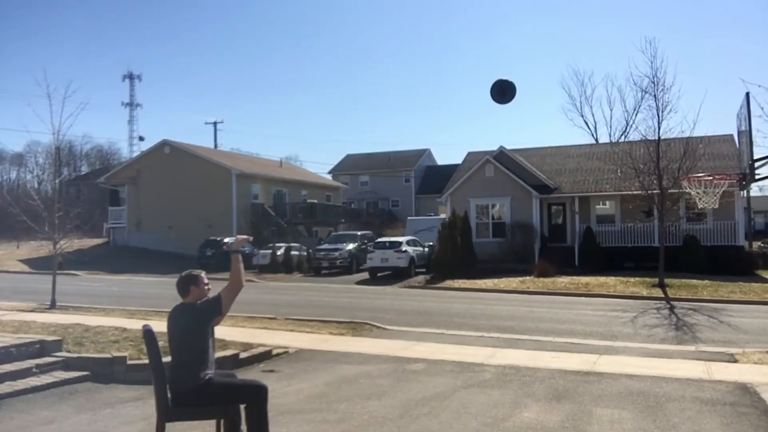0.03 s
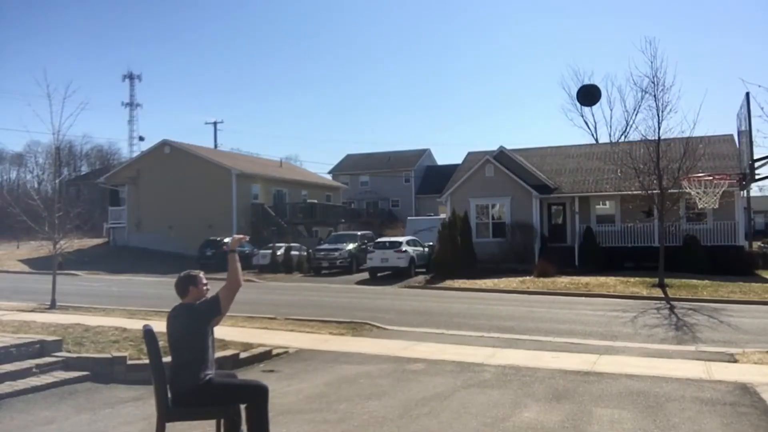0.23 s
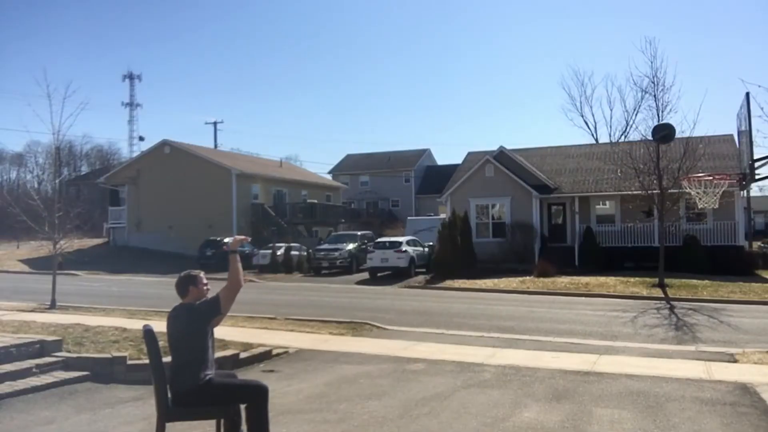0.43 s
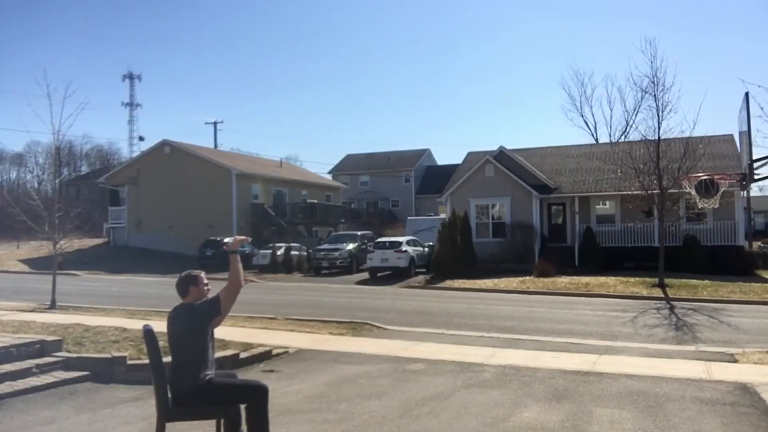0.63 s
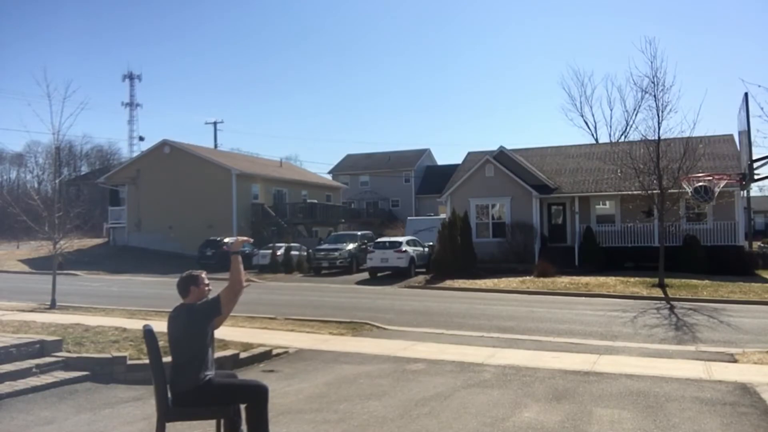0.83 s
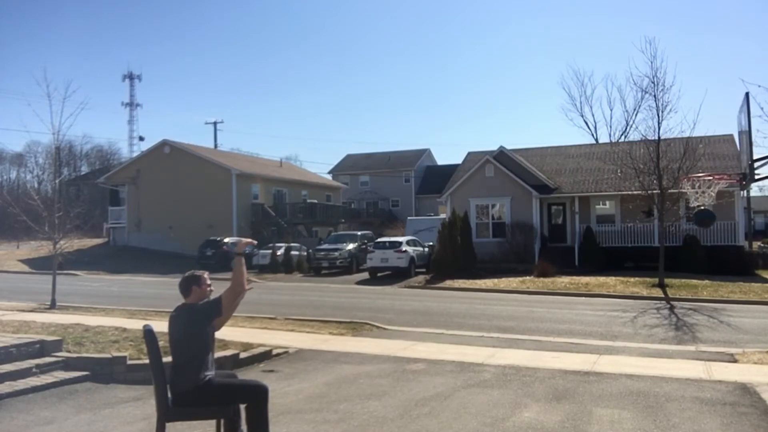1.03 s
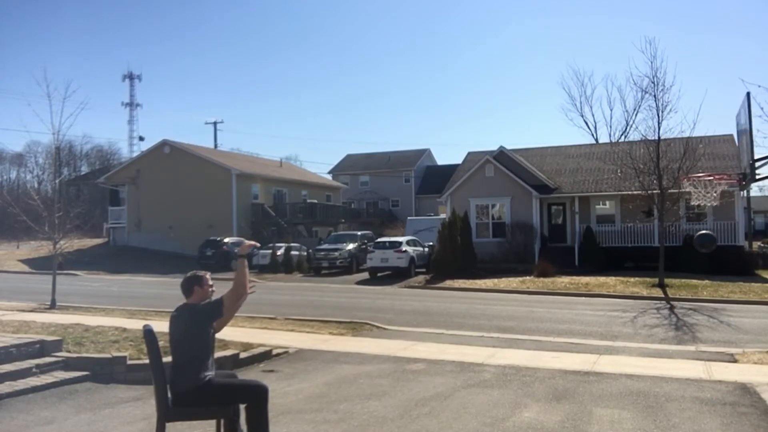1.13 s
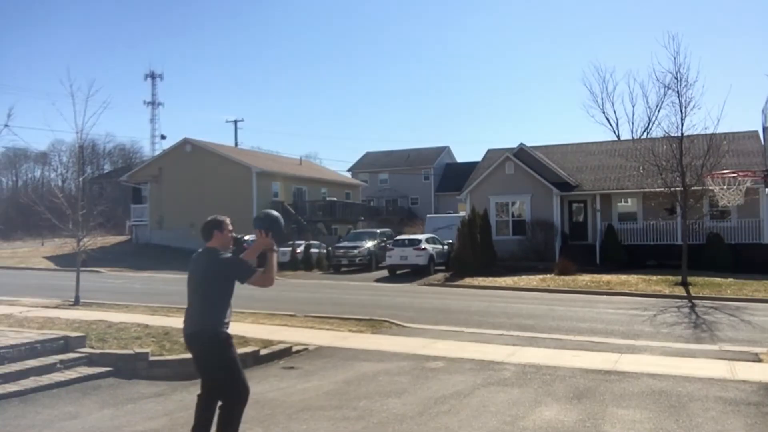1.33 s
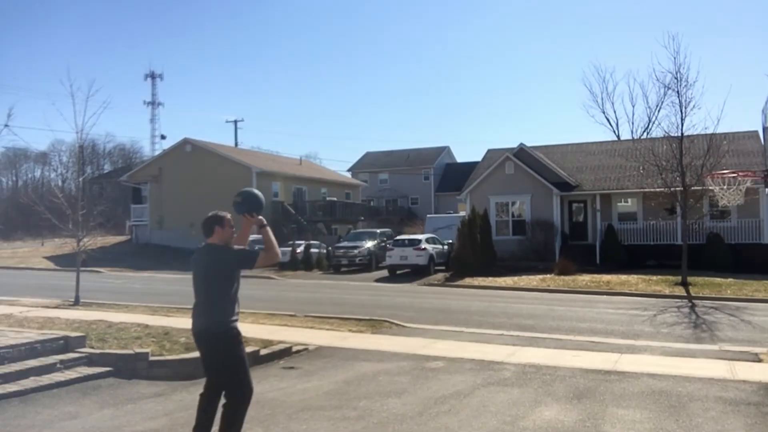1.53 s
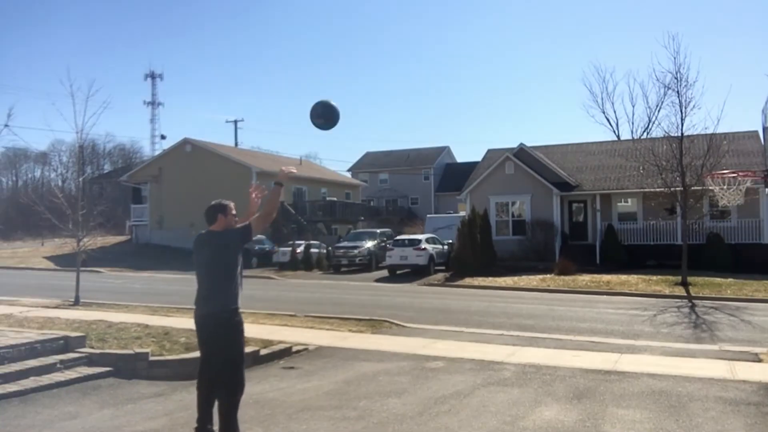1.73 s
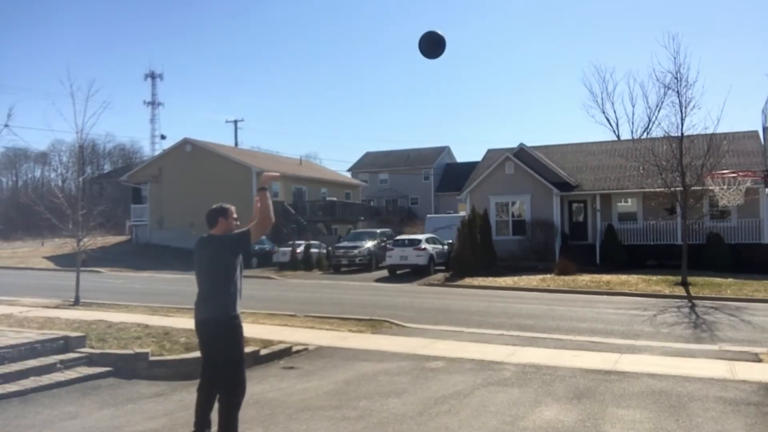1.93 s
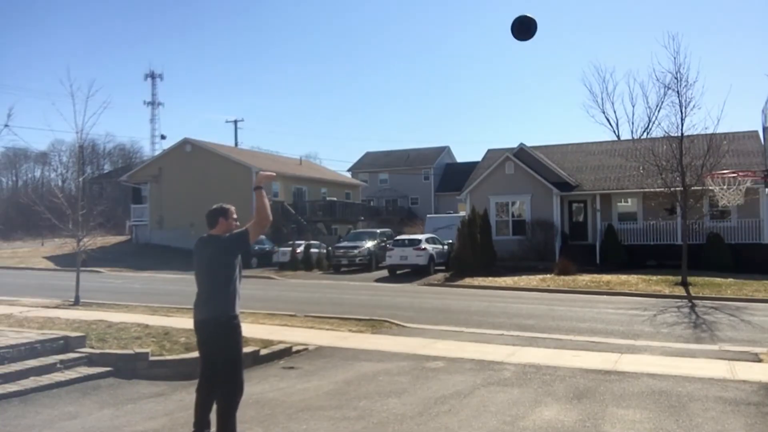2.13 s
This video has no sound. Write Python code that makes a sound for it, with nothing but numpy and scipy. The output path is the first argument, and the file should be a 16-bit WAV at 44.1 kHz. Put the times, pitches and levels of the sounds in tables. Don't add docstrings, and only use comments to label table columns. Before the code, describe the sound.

Outdoors on a quiet residential street, a loud hoop bang with jangling rim, low pole ringing and echo off houses fades, cuts abruptly to near-silent air, then a faint sole squeak; slightly hissy distant microphone.

```python
import sys
import numpy as np
from scipy import signal
from scipy.io import wavfile

SR = 44100
rng = np.random.default_rng(int(sys.argv[2]) if len(sys.argv) > 2 else 0)


def dump_mix(stems):
    frames = np.atleast_2d(stems).T
    limited = np.clip(frames, -1, 1)
    pcm = np.round(limited * 32767).astype(np.int16)
    wavfile.write(sys.argv[1], SR, pcm)


def makeup_ratio(level_db):
    decades = np.asarray(level_db, float) / 20
    return 10 ** decades


N = 95608
TIME_S = np.arange(N) / SR
CUT_S = 1.316
HIT_S = 0.618
HIT_RISE_S = 0.0047
STAND_S = 0.628


def at_hz(points, hz):
    pitch_hz, value = np.transpose(points)
    return np.interp(np.log(hz), np.log(pitch_hz), value)


def rms_one(x):
    return x / np.sqrt(np.mean(x ** 2) + 1e-20)


def ring(x, hz, t60):
    r = makeup_ratio(-60 / (t60 * SR))
    w = 2 * np.pi * hz / SR
    return signal.lfilter([0, np.sin(w)], [1, -2 * r * np.cos(w), r * r], x + 1e-18)


def noise_near(hz, q, white):
    b, a = signal.iirpeak(hz, q, SR)
    return rms_one(signal.lfilter(b, a, signal.lfilter(b, a, white)))


def drift(rate_hz):
    r = np.exp(-2 * np.pi * rate_hz / SR)
    wander = signal.lfilter([1], [1, -2 * r, r * r], rng.standard_normal(N + SR))
    return rms_one(wander[SR:])


def bump(s, width):
    return np.exp(-0.5 * ((TIME_S - s) / width) ** 2)


def dying(s, rise, t60):
    t = np.maximum(TIME_S - s, 0)
    return (1 - np.exp(-t / rise)) * makeup_ratio(-60 * t / t60)


def banded(spectrum, patchy_db, shape=None):
    edges = 28.0 * 2 ** (np.arange(29) / 3)
    white = rng.standard_normal((2, N + 4000))
    total, shaped = 0, 0
    for k, (lo, hi) in enumerate(zip(edges, edges[1:])):
        if hi <= 0.7 * spectrum[0][0]:
            continue
        level = makeup_ratio(at_hz(spectrum, np.sqrt(lo * hi)) + patchy_db * drift(8.2))
        sos = signal.butter(2, [lo, hi], "band", fs=SR, output="sos")
        band = level * signal.sosfilt(sos, white[k % 2])[4000:]
        total = total + band
        shaped = shaped + band * (shape(lo * 1.29) if shape else 1)
    return shaped / np.std(total)


def glides(rows, rough_db):
    out = np.zeros(N + SR)
    waver = makeup_ratio(rough_db * drift(88))
    for s, length, from_hz, to_hz, db in rows:
        u = np.linspace(0, 1, int(length * SR))
        i = int(s * SR)
        phase = 2 * np.pi * np.cumsum(from_hz + (to_hz - from_hz) * u) / SR
        swell = np.sqrt(np.abs(np.sin(np.pi * u)))
        out[i:i + len(u)] += makeup_ratio(db) * np.sqrt(2) * swell * np.sin(phase)
    return out[:N] * waver


# [dB, into modes under 600 Hz]
BALL_BLOWS = [(0.6175, -11, -5.5), (0.6275, -14.5, 8), (.6294, -17, -5), (0.6467, -22, -10),
              (0.6506, -27, -8), (0.66, -29, -14), (0.6315, -32, 9), (.6433, -24.5, 3.5),
              (0.6686, -17.5, -4), (.6815, -28, -18), (.702, -28, -11), (.717, -26.5, -3), (0.722, -30, -9),
              (.738, -27.5, -5), (0.742, -29, 2.5), (0.793, -35, -15), (0.861, -64, -11),
              (.9035, -30.5, -14), (1.149, -48, -16)]
# pitch_hz [Hz], level_db [dB], t60_s [s]
BOARD_MODES = [(416, -9, 0.055), (508, -19.5, 0.066), (130, -14.5, 0.03), (783, -14.5, 0.046),
               (1170, -33, 0.026), (1205, -22, 0.096), (1312, 3.5, 0.0092), (1510, -29, 0.059),
               (1700, -11.5, 0.02), (2100, -15, 0.011), (2300, -20.5, 0.023), (2900, -21, 0.017),
               (3820, -20.5, 0.024)]


def board():
    start_s, level_db, low_db = np.transpose(BALL_BLOWS)
    spread_db = rng.normal(0, 1.2, (len(start_s), len(BOARD_MODES)))
    out = np.zeros(N)
    for k, (hz, mode_db, t60) in enumerate(BOARD_MODES):
        clicks = np.zeros(N)
        click_db = level_db + mode_db - 5 + spread_db[:, k] + low_db * (hz < 600)
        clicks[(start_s * SR).astype(int)] = makeup_ratio(click_db) * (-1) ** k
        out += ring(clicks, hz, t60)
    contact_hz = 3000
    return signal.sosfilt(signal.butter(3, contact_hz, fs=SR, output="sos"), out)


# pitch_hz [Hz], level_db [dB], t60_s [s], swell_s [s]
STAND_MODES = [(51.9, -44.5, 4.6, 0.14), (57, -57, 1.5, .02), (80.2, -28.5, 1.54, 0.22),
               (109.6, -31.5, 1.94, 0.041), (189, -45, 1.97, 0.24), (229.4, -42, 1.09, 0.021),
               (243, -42.5, 1.37, 0.085), (272, -41, 0.49, 0.014), (314.4, -57, 0.35, .05),
               (411.6, -40, 0.46, 0.025)]
# pitch_hz [Hz], level_db [dB], t60_s [s]
PANEL_PUSH = [(56, -30, .1), (96, -30, 0.12), (136, -32, 0.09)]


def stand():
    t = np.maximum(TIME_S - STAND_S, 0)
    out = np.zeros(N)
    for hz, db, t60, swell in STAND_MODES:
        wobble = makeup_ratio((1 + hz / 200) * drift(7))
        out += makeup_ratio(db) * wobble * dying(STAND_S, swell, t60) * np.sin(2 * np.pi * hz * t)
    for hz, db, t60 in PANEL_PUSH:
        out += makeup_ratio(db) * dying(STAND_S, 0.0025, t60) * np.sin(2 * np.pi * hz * t)
    return out


# pitch_hz [Hz], level_db [dB], t60_s [s]
RIM_MODES = [(843, 0, 0.04), (1040, -27, 0.032), (1213, -3.5, 0.086), (1287, -12, 0.13), (1455, -2, 0.12),
             (1578, 7.5, 0.023), (1750, -3, 0.041), (5000, -34, 0.0079), (2070, -10, 0.085),
             (2400, -7.5, 0.082), (2700, -16, 0.036), (2952, -2.5, 0.043), (3250, -1, 0.028),
             (4006, 2.5, 0.014)]


def rattle():
    knocks_per_s, rattle_t60_s, wander_db = 620, 1, 3.0
    happens = rng.random(N) < knocks_per_s * makeup_ratio(2.5 * drift(30)) / SR
    knocks = happens * makeup_ratio(3.0 * np.minimum(rng.exponential(1, N), 4))
    fade = dying(HIT_S, HIT_RISE_S, rattle_t60_s)
    out = np.zeros(N)
    for hz, db, t60 in RIM_MODES:
        hits = knocks * rng.standard_normal(N) * fade
        out += makeup_ratio(db + wander_db * drift(6.6)) * ring(hits, hz, t60)
    return makeup_ratio(-38 - 13.5) * out


# pitch_hz [Hz], level_db [dB per Hz]
ECHO_COLOUR = [(76, -24), (130, -8), (141, -2), (361, -6.5), (415, -3), (571, -9), (819, -5.5),
               (2140, -3.5), (15500, -48)]
# pitch_hz [Hz], t60_s [s]
ECHO_T60 = [(160, 2.3), (420, 1.04), (1110, 1.047), (2940, 1.094), (7760, 1.24)]


def echo_tail():
    tail = banded(ECHO_COLOUR, 1.77, lambda hz: dying(HIT_S, HIT_RISE_S, at_hz(ECHO_T60, hz)))
    tail = signal.sosfilt(signal.butter(4, 150, "high", fs=SR, output="sos"), tail)
    gap_hz, gap_wide_hz, gap_share = 3550, 450, 0.6
    b, a = signal.iirpeak(gap_hz, gap_hz / gap_wide_hz, SR)
    tail -= gap_share * signal.lfilter(b, a, tail)
    return makeup_ratio(-32.5) * tail


# start_s [s], length_s [s], level_db [dB]
STAND_SHUDDERS = [
    (0.909, 0.0027, 5),
    (1.16, 0.043, 1.5),
    (1.26, 0.034, -2.5),
]


def hoop():
    shudder_db = sum(db * bump(s, w) for s, w, db in STAND_SHUDDERS)
    return board() + stand() + (rattle() + echo_tail()) * makeup_ratio(shudder_db)


# start_s [s], pitch_hz [Hz], level_db [dB], t60_s [s]
METAL_PINGS = [(.641, 2320, -31.5, 0.037), (0.662, 1400, -34, .06), (.674, 1710, -31.5, 0.053),
               (0.694, 2920, -38.5, 0.17), (.712, 2160, -34.5, 0.081), (0.728, 2760, -39, 0.094),
               (0.74, 850, -37, 0.084), (.75, 2380, -45, 0.1), (.782, 1880, -38, 0.053),
               (.818, 2800, -45, 0.056), (.85, 2250, -40, 0.039), (.898, 1545, -46, 0.056),
               (.9, 3000, -43, 0.056), (.9, 850, -51, 0.042), (.93, 1950, -50, 0.07), (1.002, 620, -52, .1),
               (1.085, 2500, -57, .1)]


def pings():
    out = np.zeros(N)
    for s, hz, db, t60 in METAL_PINGS:
        out += makeup_ratio(db) * dying(s, 0.0032, t60) * np.sin(2 * np.pi * hz * TIME_S)
    return out * makeup_ratio(2.6 * drift(66))


# start_s [s], length_s [s], level_db [dB]
BOARD_SWAYS = [
    (1.14, 0.17, -62),
    (1.269, -0.25, -74),
]
# pitch_hz [Hz], level_db [dB], t60_s [s]
BRACKET_MODES = [(1566, 7.5, 0.011), (2430, 3.5, 0.0084), (2910, -2, 0.015), (4050, -19, 0.044)]


def bracket():
    slips = rng.standard_normal(N) * (rng.random(N) < 900 / SR)
    body = sum(makeup_ratio(db) * rms_one(ring(slips, hz, t60)) for hz, db, t60 in BRACKET_MODES)
    return rms_one(body) * sum(makeup_ratio(db) * bump(s, w) for s, w, db in BOARD_SWAYS)


# start_s [s], t60_s [s], level_db [dB]
NET_BRUSHES = [(0.6155, 0.022, -42), (0.6195, 0.019, -48), (0.624, .04, -49), (0.682, 0.05, -38),
               (0.699, 0.54, -52), (.757, 0.1, -51.5), (.797, 0.09, -52), (.815, 0.098, -54),
               (.863, 0.065, -51), (0.931, 0.099, -59), (1.117, 0.089, -65), (1.151, 0.059, -61),
               (1.209, 0.025, -68)]
# pitch_hz [Hz], level_db [dB per Hz]
CORD_COLOUR = [(2500, 6.5), (5000, 6), (9000, -1.5), (12000, -7.5), (15500, -6)]


def net():
    puffs = sum(makeup_ratio(db) * dying(s, 0.0015, t60) for s, t60, db in NET_BRUSHES)
    brushing = banded(CORD_COLOUR, 1.5) * puffs
    hook_hz, hook_t60_s = 8900, 2.2 / 980
    jingle = ring(rng.standard_normal(N), hook_hz, hook_t60_s)
    jingle = rms_one(ring(jingle, hook_hz, hook_t60_s))
    flutter = makeup_ratio(2.5 * drift(40))
    return brushing + makeup_ratio(-64.5) * flutter * jingle * bump(0.836, 0.08)


# start_s [s], length_s [s], level_db [dB], pitch_hz [Hz]
CORD_SNAPS = [(0.623, 0.0014, -50, 11200), (0.691, 0.0036, -45.5, 12700), (.695, 0.0026, -46.5, 6440),
              (.704, 0.0011, -49, 5870), (0.72, 0.0039, -52, 6400), (0.765, 0.0025, -63, 10900),
              (0.821, 0.0035, -59, 12000), (1.117, 0.0013, -68.5, 7500), (1.124, .002, -73, 12100),
              (1.153, .002, -66, 15000)]


def snaps():
    white = rng.standard_normal(N)
    return sum(makeup_ratio(db) * noise_near(hz, 2.2, white) * bump(s, width) for s, width, db, hz in CORD_SNAPS)


# start_s [s], length_s [s], from_hz [Hz], to_hz [Hz], level_db [dB]
SOLE_SQUEAKS = [
    (1.65, 0.066, 1920, 1750, -67.5),
    (1.697, 0.0395, 1160, 1040, -57.5),
]
# pitch_hz [Hz], level_db [dB per Hz]
SCRAPE_COLOUR = [(500, -41), (1400, 7.5), (2500, -7.5), (6000, -13.5), (15000, -28)]
# start_s [s], length_s [s], level_db [dB]
CLOTH_RUSTLES = [
    (1.53, 0.15, -70.5),
    (1.869, 0.065, -72),
]
# pitch_hz [Hz], level_db [dB per Hz]
CLOTH_COLOUR = [(1000, 0), (3000, 3), (7000, -5), (12000, -21)]
# start_s [s], level_db [dB], pitch_hz [Hz]
GRIT_TICKS = [(.03, -66.5, 5000), (1.384, -67, 4380), (1.42, -66, 5950), (1.441, -62, 4270),
              (1.443, -59, 2250), (1.454, -60, 2300), (1.647, -68, 1600), (1.654, -62, 1410),
              (1.659, -58, 1700), (1.64, -69, 1600), (1.693, -59, 1800), (1.745, -69, 2450)]


def shoes():
    squeaks = glides(SOLE_SQUEAKS, 3.2)
    scrape = makeup_ratio(-62.5 + 1.7 * drift(50)) * banded(SCRAPE_COLOUR, 1.1) * bump(1.675, 0.059)
    rustles = banded(CLOTH_COLOUR, 1.7) * sum(makeup_ratio(db) * bump(s, w) for s, w, db in CLOTH_RUSTLES)
    heel_s, heel_hz, heel_t60_s = 1.699, 1330, 0.0043
    tap = makeup_ratio(-39 - 19.5) * (np.arange(N) == int(heel_s * SR))
    heel = ring(ring(tap, heel_hz, heel_t60_s), heel_hz, heel_t60_s)
    white = rng.standard_normal(N)
    ticks = sum(makeup_ratio(db) * noise_near(hz, 1.2, white) * bump(s, 0.0021) for s, db, hz in GRIT_TICKS)
    return squeaks + scrape + rustles + heel + ticks


# start_s [s], length_s [s], from_hz [Hz], to_hz [Hz], level_db [dB]
BIRD_NOTES = [(0., 0.028, 2400, 2520, -67.5), (.03, 0.019, 2624, 2300, -63), (.09, 0.032, 2445, 2660, -68),
              (.115, 0.019, 2760, 2570, -62.5), (.128, 0.012, 2620, 2300, -63.5),
              (.20, 0.022, 2594, 2400, -70.5), (.228, 0.025, 2700, 2293, -64.5),
              (.265, 0.045, 2550, 2474, -78), (.06, 0.033, 2570, 2480, -77), (.045, 0.039, 1860, 1830, -73),
              (.135, 0.041, 1845, 1850, -72), (.535, 0.028, 3000, 2900, -68),
              (.575, 0.024, 2845, 2900, -69.5), (.56, 0.019, 2300, 2250, -68.5),
              (.583, 0.026, 2210, 2580, -59.5), (1.09, 0.032, 2540, 2453, -62),
              (1.13, 0.034, 2613, 2370, -61), (1.268, 0.015, 3250, 3250, -70),
              (1.105, 0.024, 3920, 4050, -69), (1.265, 0.032, 3980, 4010, -73),
              (1.315, 0.078, 2580, 2100, -68)]


def birds():
    chirps = glides(BIRD_NOTES, 3.5)
    echo_s = np.arange(SR // 8) / SR
    echo = rng.standard_normal(SR // 8) * makeup_ratio(-60 * echo_s / 0.3)
    return 0.75 * chirps + makeup_ratio(-30) * signal.fftconvolve(chirps, echo)[:N]


# pitch_hz [Hz], level_db [dB per Hz]
AIR_COLOUR = [(55, -1), (190, -9), (240, -8), (650, -17.5), (1000, -14.5), (3000, -28.5), (6500, -36.5),
              (12000, -53)]


def street():
    air = makeup_ratio(-61.5) * banded(AIR_COLOUR, 0.51)
    hum_hz, hum_wide_hz = 58.9, 9.1
    hum = rms_one(ring(rng.standard_normal(N + SR), hum_hz, 3.6 / hum_wide_hz)[SR:])
    hum_db = -65 - 6 * (TIME_S > CUT_S)
    return air + makeup_ratio(hum_db) * hum + makeup_ratio(-83.5) * rng.standard_normal(N)


# pitch_hz [Hz], level_before_db [dB, before the scene changes], level_after_db [dB]
MACHINE_WHINE = [(229.5, -72.5, -70), (347.4, -76.5, -80.5), (520.2, -79, -79), (941, -77.5, -98),
                 (992, -83, -94)]


def whine():
    late = TIME_S > CUT_S
    out = np.zeros(N)
    for hz, before_db, after_db in MACHINE_WHINE:
        tone = rms_one(ring(rng.standard_normal(N + SR), hz, 0.7)[SR:])
        out += makeup_ratio(np.where(late, after_db, before_db)) * tone
    return out


def scene():
    first = TIME_S < CUT_S
    hoop_and_ball = (hoop() + pings() + bracket() + net() + snaps()) * first
    air = street() * makeup_ratio(-0.5 * ~first)
    return (hoop_and_ball + shoes() + birds() + air + whine())[None]


def low_pass(x):
    return signal.sosfilt(signal.butter(12, 15830, fs=SR, output="sos"), x)


def record(dry):
    mix = signal.sosfilt(signal.butter(5, 41.2, "high", fs=SR, output="sos"), dry)
    limit = 0.47
    mix = limit * np.tanh(mix / limit)
    t = TIME_S - CUT_S
    fade_out_s, fade_in_s = 0.025, 0.022
    mix = mix * np.clip(np.maximum(-t / fade_out_s, t / fade_in_s), 0.02, 1)
    return low_pass(mix)


dry = scene()
out = record(dry)
dump_mix(out)
```